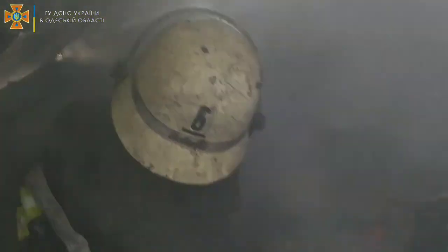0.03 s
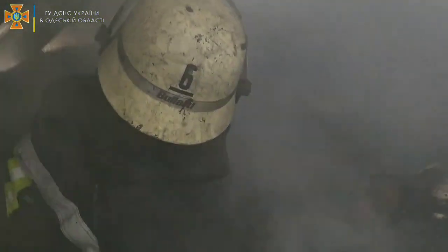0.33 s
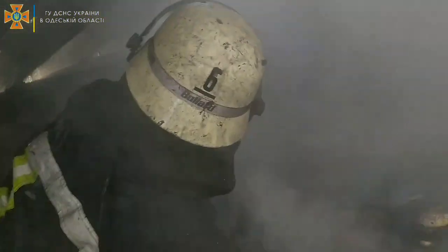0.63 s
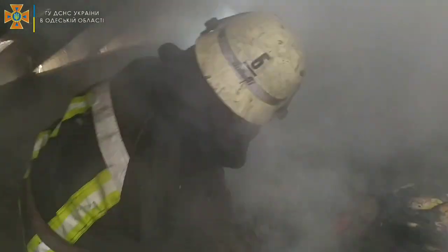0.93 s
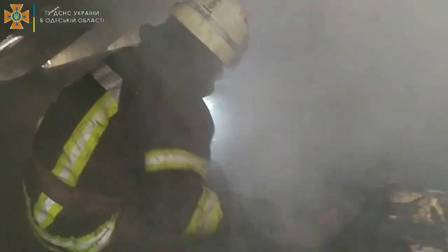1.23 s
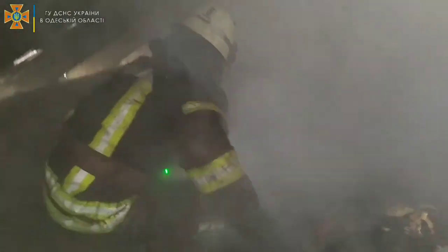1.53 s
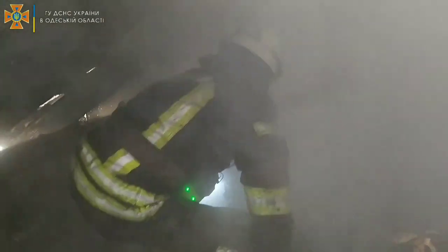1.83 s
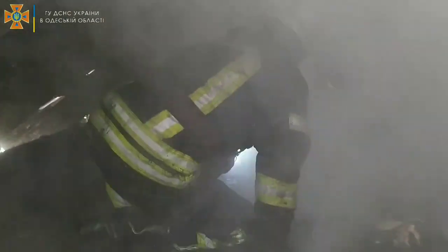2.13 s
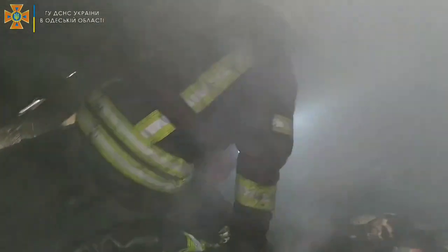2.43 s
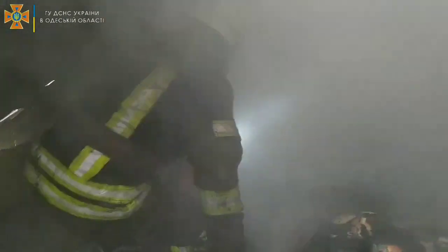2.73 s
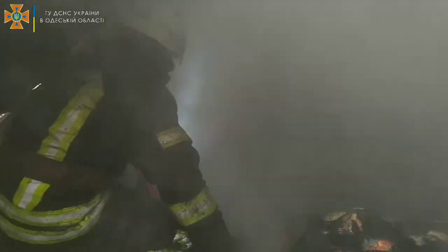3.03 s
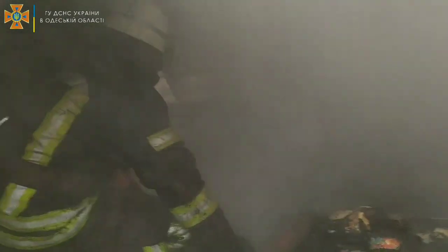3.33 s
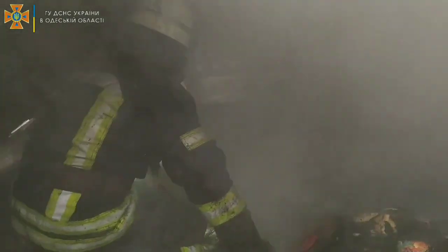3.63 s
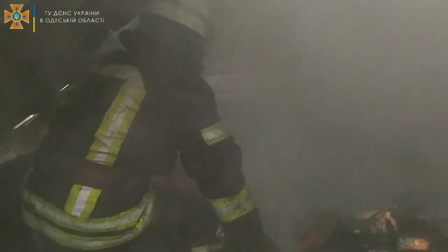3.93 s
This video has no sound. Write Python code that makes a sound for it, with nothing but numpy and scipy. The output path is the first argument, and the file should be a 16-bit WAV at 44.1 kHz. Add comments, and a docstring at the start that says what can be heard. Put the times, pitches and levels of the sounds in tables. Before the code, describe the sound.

A fire hose sprays water close by in a room, with a loud, bright hiss that shifts in tone. The jet roars and drums on walls and debris, strongest in the first 1.5 seconds, with dull thumps from about 0.8 to 1.7. At 2.7 it drops to a thin spray, then reopens in two steps around 3.7. Drops patter softly and a pump drones faintly throughout.

```python
"""A loud hiss and a roar come first: a firefighter sprays water from a nearby hose in a burnt-out room.
The hiss of the spray changes colour as he turns; walls and debris roar and drum as the jet sweeps them.
Near the end he throttles the nozzle to a thin spray for a second, then reopens it in two steps.
Slugs of water thump on loose debris, drops patter down, and a pump drones faintly outside."""
import sys
import numpy as np
from scipy import signal
from scipy.fft import rfft, irfft, next_fast_len
from scipy.io import wavfile
from scipy.ndimage import uniform_filter1d, map_coordinates

SR = 44100
rng = np.random.default_rng(int(sys.argv[2]) if len(sys.argv) > 2 else 0)


def dump_mix(stems):
    """Bounce the given channels to the path in sys.argv[1] as a 16-bit WAV at rate SR."""
    frames = np.atleast_2d(stems).T  # one column per channel
    limited = np.clip(frames, -1, 1)  # hard clip at full scale
    pcm = np.round(limited * 32767).astype(np.int16)
    wavfile.write(sys.argv[1], SR, pcm)


N = 176400  # 4 seconds

# steady tones of the pump's engine (pitch [Hz], level [dB])
PUMP_TONES = [(50, -54.5), (73, -53.5)]
# colour of the pump's rumble (frequency [Hz], relative level [dB])
PUMP_SPECTRUM = [(20, -32), (38, -13), (55, -4), (72, 2), (95, -5.5), (130, -16), (220, -12.5), (400, -14),
                 (900, -43), (3000, -46)]
# how alike the room sounds in both ears (frequency [Hz], likeness [0 to 1])
EAR_LIKENESS = [(60, 1), (150, 1), (260, 1), (500, 0.89), (900, 0.21), (2000, 0.029)]
# slugs of water hitting loose debris (time [s], pitch [Hz], strength [dB])
SLUG_HITS = [(0.818, 76, -24.5), (0.885, 62, -26), (1.123, 65, -20), (1.365, 85, -25)]
# hollow things under the jet (start [s], length [s], pitch [Hz], level [dB])
HOLLOW_BOOMS = [(0.766, 0.06, 235, -34), (0.768, 0.15, 160, -38.5), (0.83, 0.11, 78, -36),
                (0.89, 0.12, 265, -41), (1.146, 0.11, 68, -34.5), (1.353, 0.054, 135, -36),
                (1.466, 0.06, 103.4, -35), (1.64, 0.16, 232.5, -41), (1.715, 0.04, 140, -38),
                (2.537, 0.038, 220, -46), (3.92, .08, 69, -41)]
# pitches at which walls and debris ring (pitch [Hz], width [Hz], boost [dB])
RESONANCES = [(165, 23, 3.5), (235, 47, 0.5), (524, 15, 2.5), (870, 27, 4), (1080, 29, 0), (1400, 85, 2),
              (1700, 120, 2), (2180, 150, 1)]
# how hard the struck surfaces drum (time [s], relative level [dB])
DRUM_LEVEL = [(0, -40), (.25, -38), (.55, -39), (.7, -41.5), (.76, -43), (.95, -38), (1.08, -42),
              (1.15, -39), (1.38, -40), (1.56, -43), (1.65, -34), (1.77, -38), (1.86, -44), (2.55, -46),
              (2.72, -45), (2.8, -52.5), (3.31, -53), (3.37, -45.5), (3.55, -51.5), (3.73, -64),
              (3.78, -39), (3.87, -48.5), (3.98, -38.5)]
# colour of that drumming (frequency [Hz], relative level [dB])
DRUM_SPECTRUM = [(25, -23), (55, -1.5), (100, 1), (150, 1), (190, -2.5), (250, -1), (340, -5.5), (600, -12),
                 (1500, -36)]
# how hard the jet roars on walls and debris (time [s], relative level [dB])
ROAR_LEVEL = [(0, -23.5), (.09, -42.5), (.17, -23.5), (.35, -23), (.53, -24.5), (.6, -35.5), (.66, -49),
              (.705, -40.5), (.745, -28), (.93, -26.5), (1.02, -32), (1.07, -39.5), (1.12, -31.5),
              (1.19, -35.5), (1.28, -24.5), (1.41, -26.5), (1.5, -36), (1.58, -40), (1.72, -32),
              (1.87, -43), (2.3, -39.5), (2.45, -42.5), (2.58, -38), (2.7, -41), (2.78, -50), (3.3, -50.5),
              (3.37, -48.5), (3.6, -50), (3.75, -49), (3.85, -40), (4, -34)]
# colour of that roar (frequency [Hz], relative level [dB])
ROAR_SPECTRUM = [(100, -29), (280, -7), (480, -1), (850, 0.5), (1150, -1), (1500, -2), (2200, -3),
                 (3200, -7.5), (5000, -13.5), (10000, -13)]
# the band of the roar that each surface boosts or cuts (time [s], pitch [Hz], boost [dB])
SURFACE_BAND = [(0, 700, -0.5), (.2, 700, 0.5), (.55, 1000, 0), (.76, 880, 3.5), (.95, 900, -0.5),
                (1.15, 1500, 3.5), (1.32, 2100, 3.5), (1.5, 1800, 0), (1.72, 560, 3), (2.0, 1400, 4.5),
                (2.75, 1200, -1), (3.0, 2120, 3.5), (3.25, 1500, -6), (3.45, 2000, 3.5), (3.7, 1700, 7),
                (3.85, 1200, -2)]
# loudness of the flow through the nozzle (time [s], relative level [dB])
FLOW_LEVEL = [(0, -21), (.3, -22.5), (.52, -22), (.655, -22.5), (.695, -28.5), (.8, -27), (1.03, -24.5),
              (1.075, -25.5), (1.12, -24), (1.8, -26), (2.6, -26), (2.685, -30.5), (2.695, -25.5),
              (2.71, -29.5), (2.735, -38.5), (2.79, -40), (2.88, -45), (2.95, -44), (3.0, -46), (3.17, -48),
              (3.27, -45), (3.36, -47.5), (3.62, -46.5), (3.65, -37), (3.755, -36), (3.782, -28.5),
              (4, -30)]
# the jet's lower rush, on top of the flow's level (time [s], relative level [dB])
RUSH_LEVEL = [(0, -4), (.45, -4.5), (.68, -10), (.8, -1), (1.05, -8.5), (1.33, -2.5), (1.55, -7),
              (1.85, -8.5), (2.6, -7.5), (2.71, -15.5), (2.9, -6), (3.55, -8), (3.68, -6), (4, -9)]
# colour of that rush (frequency [Hz], relative level [dB])
RUSH_SPECTRUM = [(500, -21), (1600, -8.5), (2700, -3.5), (3600, 1.5), (4200, 0.5), (4950, -2.5), (5700, -3),
                 (6500, -5), (10000, -24)]
# colour of the spray's hiss (frequency [Hz], relative level [dB])
HISS_SPECTRUM = [(300, -57), (1500, -12), (4000, -7), (5100, -10), (6200, -1.5), (7500, -0.5), (10000, 0.5),
                 (12500, -0.5), (15500, -4)]
# the turning nozzle (time [s], bright pitch [Hz], treble boost [dB], left over right [dB])
NOZZLE_AIM = [(0, 6500, -1.5, 2.5), (.25, 6600, -0.5, 3.5), (.52, 7700, -4.5, 2), (.72, 6700, 5.5, 5.5),
              (1.0, 7700, 1.5, 3.5), (1.4, 7960, 2, 4.5), (1.74, 9200, 1, 4.5), (2.0, 9300, -1, 4),
              (2.5, 9200, 0.5, 3.5), (3.1, 9400, -3, 6.5), (4, 9600, 1.5, 4.5)]
# a dark band that slides through the hiss as he turns (time [s], pitch [Hz], gain [dB])
DARK_BAND = [(0, 11300, -2), (.27, 10400, -8.5), (.52, 11400, -2.5), (.74, 9800, -5.5), (1.05, 10800, -5.5),
             (1.43, 11000, -7.5), (1.8, 12500, -5.5), (4, 13300, -4)]
# the nozzle's direction (time [s], lag of the left ear [ms])
LEFT_EAR_LAG = [(0, 0.21), (.3, 0.27), (.62, 0.21), (1.25, -0.051), (1.7, 0.048), (2.15, 0.18), (4, 0.13)]

LOW_CUT_HZ, TOP_HZ = 31, 15850


def amp(db):
    """Turn decibels into a gain to multiply by."""
    return 10 ** (np.asarray(db) / 20)


def unit(x):
    """Scale a sound to an average (rms) size of 1."""
    return x / np.sqrt(np.mean(x ** 2) + 1e-20)


def along(points, hz):
    """Read a (frequency, value) table at hz, on a log frequency scale."""
    freqs, values = np.transpose(points)
    return np.interp(np.log(hz + 1), np.log(freqs + 1), values)


def curves(rows, t=None):
    """Turn each column after the time into a curve, per sample or at the times t."""
    times, *columns = np.transpose(rows)
    return [np.interp(np.arange(N) / SR if t is None else t, times, column) for column in columns]


def wobble(rate):
    """A smooth curve through `rate` random values a second."""
    return map_coordinates(rng.standard_normal(int(N * rate / SR) + 4), [np.arange(N) * rate / SR])


def filtered(x, response):
    """Give each frequency in x the gain response(hz)."""
    size = next_fast_len(N + SR // 2)
    return irfft(rfft(x, size) * response(np.fft.rfftfreq(size, 1 / SR)), size)[..., :N]


def panned(x, left_db):
    """Lean a stereo sound to the left."""
    return np.array([x[0] * amp(left_db / 2), x[1] * amp(-left_db / 2)])


def turbulence(colour, patchy_db, rings=()):
    """Churning stereo noise in the room: randomly louder in patches, boosted where things ring."""
    noise = signal.stft(rng.standard_normal((2, N)), nperseg=1024)[2]
    patches = uniform_filter1d(rng.standard_normal(noise.shape[1:]), size=3, axis=0)
    patches = uniform_filter1d(patches, size=9, axis=1)
    pair = signal.istft(noise * amp(patchy_db * unit(patches)), nperseg=1024)[1][:, :N]

    def response(hz):
        ring_db = sum(db / (1 + (2 * (hz - centre) / width) ** 2) for centre, width, db in rings)
        spread = np.arccos(np.clip(along(EAR_LIKENESS, hz), -1, .98)) / 2
        return amp(along(colour, hz) + ring_db) * [np.cos(spread), np.sin(spread)]

    mid, side = filtered(pair, response)
    return unit(np.array([mid + side, mid - side]))


def drops(per_s, hz, cycles, spread, size_db):
    """Each drop lands with a tiny, fading ring of random pitch, size and side."""
    count = int(per_s * N / SR)
    when, size, side, delay = rng.random((count, 4)).T
    pitch = np.minimum(hz * np.exp(spread * rng.standard_normal((count, 1))), TOP_HZ)
    age = np.arange(256)  # samples
    turns = pitch * age / SR
    strength = amp(-size_db * np.log(np.maximum(size, 1 / 100)))
    rings = strength[:, None] * np.sin(2 * np.pi * turns) * np.exp(-2 * turns / cycles)

    def ear(gain, lag_samples):
        places = (when * N + lag_samples).astype(int)[:, None] + age
        return np.bincount(places.ravel(), (rings * gain[:, None]).ravel(), N)[:N]

    return unit(np.array([ear(np.sqrt(side), 10), ear(np.sqrt(1 - side), 20 * delay)]))


def pump():
    """The engine outside drones: slightly wavering tones over a low rumble."""
    t = np.arange(N) / SR
    tones = sum(amp(db) * np.sqrt(2) * np.sin(2 * np.pi * (hz * t + 0.27 * wobble(6)))
                for hz, db in PUMP_TONES)
    return tones + amp(-50.5) * turbulence(PUMP_SPECTRUM, patchy_db=3.0)


def patter():
    """Water falls softly on the debris."""
    return amp(-60) * drops(per_s=1100, hz=3000, cycles=3.6, spread=0.42, size_db=-3.5)


def thumps(attack_s=0.006, fade_s=0.15):
    """A slug of water gives loose debris one dull, quickly dying knock."""
    out = np.zeros(N)
    for start, hz, db in SLUG_HITS:
        age = np.maximum(np.arange(N) / SR - start, 0)
        rise = 1 - np.exp(-age / attack_s)
        out += amp(db - 60 * age / fade_s) * rise * np.sin(2 * np.pi * hz * age)
    return out


def booms(attack_s=0.021, release_s=0.04, shake_db=2):
    """Each hollow thing rumbles unsteadily around its own pitch while the jet is on it."""
    t = np.arange(N) / SR
    out = np.zeros(N)
    for start, length, hz, db in HOLLOW_BOOMS:
        end = start + length
        held = np.interp(t, [start - attack_s, start, end, end + release_s], [0, 1, 1, 0])
        gain = amp(db + shake_db * wobble(50))
        tone = np.sin(2 * np.pi * (hz * t + 0.3 * wobble(35)))
        out += held * gain * unit(tone)
    return out


def surface_drumming():
    """Walls and debris give a deep, uneven drumming under the jet."""
    drum_db, = curves(DRUM_LEVEL)
    gain = amp(drum_db - 0.5 + 0.91 * wobble(30))
    return gain * turbulence(DRUM_SPECTRUM, patchy_db=4.0, rings=RESONANCES)


def off_surface(x, width_octaves=0.43):
    """The surface under the jet colours its sound by boosting or cutting one band."""
    hz, t, spectrum = signal.stft(x, SR, nperseg=1024)
    centre_hz, boost_db = curves(SURFACE_BAND, t)
    octaves = np.log2((hz[:, None] + 1) / centre_hz)
    gain = amp(boost_db * np.exp(-.5 * (octaves / width_octaves) ** 2))
    return unit(signal.istft(spectrum * gain, nperseg=1024)[1][:, :N])


def surface_roar():
    """The jet roars where it strikes, changing colour from one surface to the next."""
    roar_db, = curves(ROAR_LEVEL)
    gain = amp(roar_db + 2.5 + 0.57 * wobble(45.12))
    roar = off_surface(turbulence(ROAR_SPECTRUM, patchy_db=2.2, rings=RESONANCES))
    return panned(gain * roar, left_db=-0.5)


def near_echoes(x, count=12, gain=0.145, delay_ms=(0.5, 9), drift_ms=0.14):
    """Floor, helmet and walls send back weak echoes that drift as he moves, so the spray sounds hollow."""
    def echo(ear, ms):
        delay_samples = SR * (ms + drift_ms * wobble(2.5)) / 1000
        return map_coordinates(ear, [np.arange(N) - delay_samples])

    echoes = np.array([sum(echo(ear, ms) for ms in rng.uniform(*delay_ms, count)) for ear in x])
    return (x + gain * echoes) / np.sqrt(1 + count * gain ** 2)


def spray_hiss(direct_share=0.17):
    """Fine spray hisses, with a bright band and a dark band that slide as the nozzle turns."""
    hz, t, noise = signal.stft(rng.standard_normal((3, N)), SR, nperseg=512)
    hz = hz[:, None]
    bright_hz, treble_db, _ = curves(NOZZLE_AIM, t)
    dark_hz, dark_db = curves(DARK_BAND, t)
    lag_ms, = curves(LEFT_EAR_LAG, t)
    # a little of the hiss comes straight to both ears, reaching one just before the other
    half_lag = np.exp(-1j * np.pi * hz * lag_ms / 1000)
    direct = noise[2] * np.array([half_lag, half_lag.conj()])
    pair = np.sqrt(1 - direct_share) * noise[:2] + np.sqrt(direct_share) * direct
    band = lambda centre_hz, width_hz: np.exp(-.5 * ((hz - centre_hz) / width_hz) ** 2)
    gain = amp(along(HISS_SPECTRUM, hz)
               + 4.5 * band(bright_hz, width_hz=1600)
               + dark_db * band(dark_hz, width_hz=1540)
               + treble_db / (1 + np.exp((12300 - hz) / 500)))  # treble above 12300 Hz
    gain /= np.linalg.norm(gain, axis=0)  # the colour moves, the power stays
    return unit(signal.istft(pair * gain, nperseg=512)[1][:, :N])


def nozzle():
    """The flow drives the hiss, the flying droplets and a lower rush; all flutter as the jet breaks up."""
    flow_db, = curves(FLOW_LEVEL)
    rush_db, = curves(RUSH_LEVEL)
    _, _, left_db = curves(NOZZLE_AIM)
    hiss = amp(3) * spray_hiss()
    droplets = amp(-9.5) * drops(per_s=800, hz=7700, cycles=2.3, spread=0.35, size_db=2.5)
    rush = amp(rush_db + 2.5) * turbulence(RUSH_SPECTRUM, patchy_db=3.0)
    flutter_db = 0.39 * wobble(25.08) + 0.5 * wobble(300)
    spray = amp(0.55 * wobble(20)) * (hiss + droplets)
    return amp(flow_db + flutter_db) * panned(spray + rush, left_db)


def scene():
    """Add up the nozzle, the things its jet strikes, and the background."""
    hose = near_echoes(nozzle())
    struck = surface_roar() + surface_drumming() + booms() + thumps()
    return hose + struck + patter() + pump()


def record(dry):
    """Fade out the deepest rumble and cut off the highest treble."""
    return filtered(dry, lambda hz: (hz < TOP_HZ) * (1 - 1 / (1 + (hz / LOW_CUT_HZ) ** 4)))


dry = scene()
out = record(dry)
dump_mix(out)
```